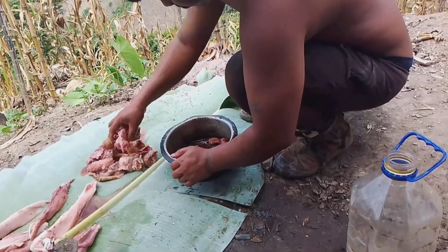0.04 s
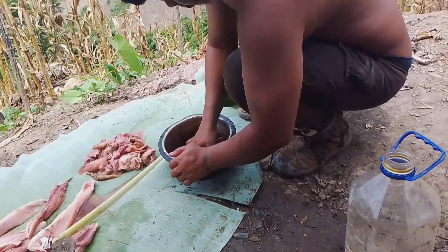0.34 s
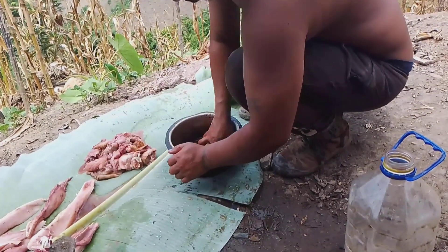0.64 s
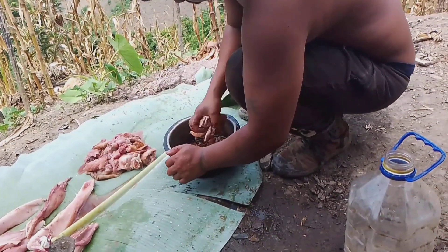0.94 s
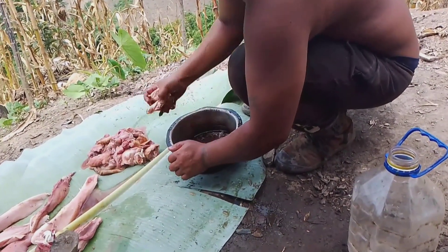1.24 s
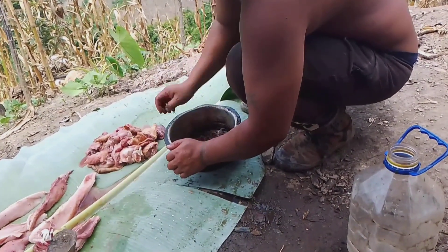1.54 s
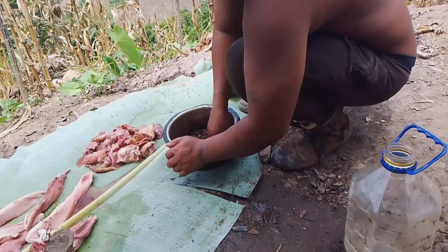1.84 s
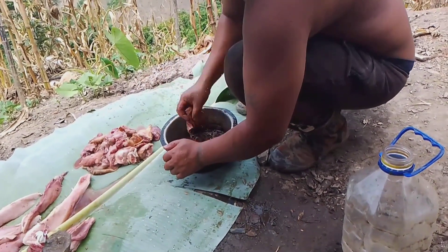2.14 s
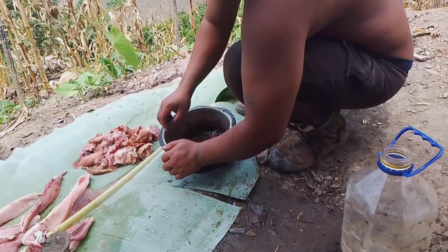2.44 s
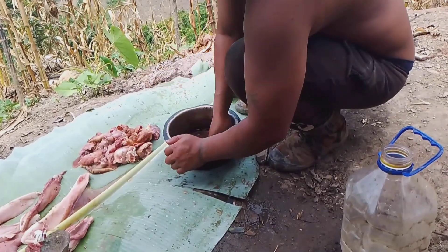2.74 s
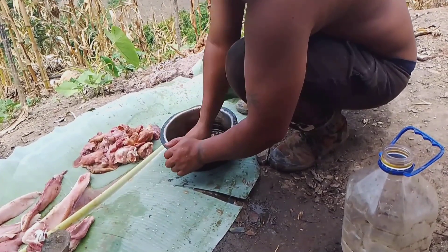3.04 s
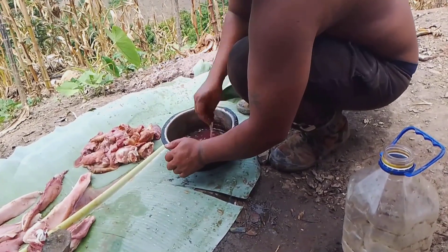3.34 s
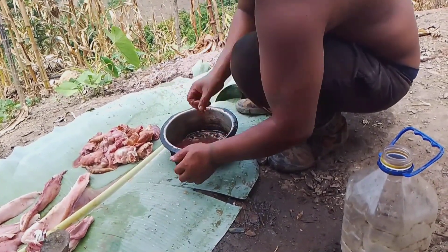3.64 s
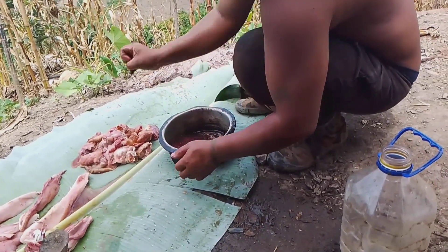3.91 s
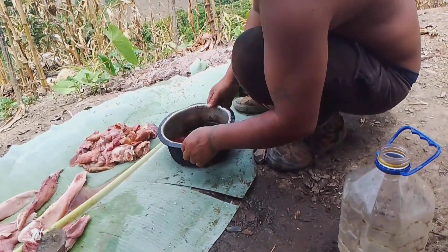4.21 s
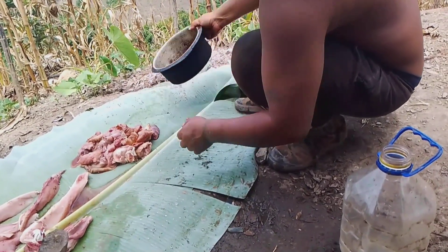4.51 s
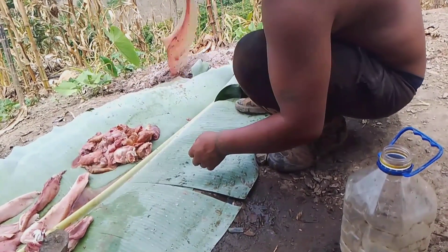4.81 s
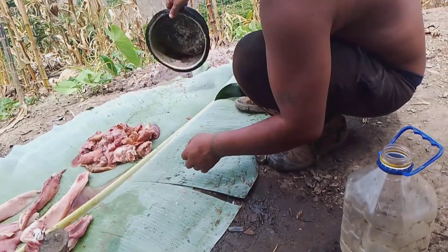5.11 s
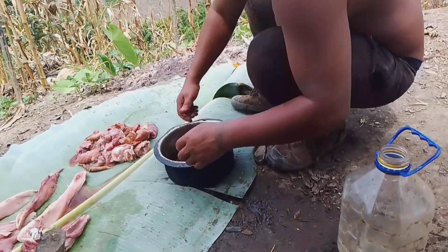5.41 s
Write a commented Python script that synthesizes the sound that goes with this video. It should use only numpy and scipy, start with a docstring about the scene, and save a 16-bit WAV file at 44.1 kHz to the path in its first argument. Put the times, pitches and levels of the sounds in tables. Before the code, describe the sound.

Close, wet handling of raw meat in a metal pot is heard over a soft, steady rush of outdoor air. Short squelches and sticky smacks start at about 0.2 seconds and are strongest between 0.5 and 0.7, with a tiny wet squeak and a faint ring of the pot. Sharp wet snaps follow around 1.1 and 1.5 seconds, then softer squishes near 2. A busier run of squelching and clicking lasts from about 2.5 to 3.7 seconds, with small plops of juice dripping back. A few faint wet sounds follow, and a plop with a light metal ring comes at 4.7. From about 4.9 to 5.1 seconds, flung water spatters on soil and dry leaves. After one more wet smack, the pot is set down at about 5.5 seconds with a dull, slightly crunchy knock, the loudest sound.

```python
"""Wet squelches and smacks: outdoors, a hand fishes raw chicken out of a metal pot and heaps it on a leaf.
Tiny wet films burst as the meat is squeezed, and bigger ones snap as it parts. Juice drips back with
short plops, and light touches make the pot ring. The last of the water is flung out and spatters on
dry ground; then the pot is set down with one dull knock. Behind it all is the soft rush of open air."""
import sys
import numpy as np
from scipy import signal
from scipy.fft import rfft, irfft
from scipy.io import wavfile
from scipy.ndimage import uniform_filter1d

SR = 44100
rng = np.random.default_rng(int(sys.argv[2]) if len(sys.argv) > 2 else 0)


def int16_out(signal):
    """Quantize to a 16-bit WAV file."""
    q = np.round(np.clip(np.atleast_2d(signal).T, -1, 1) * 32767)
    wavfile.write(sys.argv[1], SR, q.astype(np.int16))


N = 245195

# the tone of wet meat and juice: pitch_hz, level_db
WET_TONE = [(60, -54), (200, -18.5), (420, 1.5), (680, -4.5), (1000, 1.5), (2000, 7.5), (4300, 5),
            (5700, -0.5), (7200, -9.5), (10500, -22), (12500, -33), (15500, -37)]
# the tone of the finest spray from a snap: pitch_hz, level_db
CRISP_TONE = [(100, -41), (4000, 1), (7000, 3), (11000, -2.5), (12500, -13), (15500, -16)]


def squelches(best_gap_hz=2300, gap_width_share=0.29):
    """Each squeeze bursts a swarm of tiny films that ring a gap in the flesh and the pot's hollow."""
    # fingers squeezing the meat, and at 4.703 s a wet touch as the water is poured: start_s, length_s,
    # level_db, gap_pitch_hz
    squeezes = [(0.191, 0.048, -54, 3700), (0.496, 0.052, -46.5, 1900), (.578, 0.072, -43, 2640),
                (0.723, 0.092, -51.5, 3220), (1.49, 0.033, -45, 4230), (1.787, 0.125, -51, 1200),
                (1.95, 0.045, -55, 1990), (2.65, 0.037, -47.5, 1000), (2.695, 0.076, -49, 2300),
                (2.835, 0.055, -55, 2000), (2.901, 0.043, -50, 3870), (3.135, 0.04, -55.5, 1500),
                (3.172, 0.033, -48.5, 1800), (3.203, 0.05, -47.5, 2000), (3.247, .095, -49, 1400),
                (3.485, 0.025, -56, 4250), (3.663, 0.034, -49, 1300), (4.097, 0.035, -53, 4100),
                (4.366, 0.06, -56.5, 950), (4.496, .03, -57, 1100), (4.703, 0.026, -48, 1900),
                (5.239, 0.11, -57, 1400), (5.4, 0.032, -52.5, 1400)]
    out, t = np.zeros(N), np.arange(8192) / SR
    for start_s, length_s, level_db, gap_hz in squeezes:
        octaves = np.log2(gap_hz / best_gap_hz)
        gap_db = -15 * abs(octaves)  # a middle-sized gap rings best
        hollow_db = -10.5 - 6.5 * octaves  # a wide, low gap wakes the pot more
        sticky_db = -25 + 14 * octaves  # a narrow, high gap gives more sticky ticks
        pops = colour(crackle(len(t), per_s=6000, spread_db=3, cycles=7.7), WET_TONE)
        gap = unit(resonate(pops, gap_hz, gap_width_share * gap_hz))
        low_hollow = resonate(resonate(pops, 940, 410), 993, 410)
        hollow = unit(low_hollow + amp(-12.5) * resonate_twice(pops, 1580, 360))
        sticky = colour(crackle(len(t), per_s=2000, spread_db=2.5, cycles=3, pitches=8), CRISP_TONE)
        squeeze = np.minimum(t / 0.0024, 1) * np.exp(-(t / (0.86 * length_s)) ** 3)
        sound = squeeze * (pops + amp(gap_db) * gap + amp(hollow_db) * hollow + amp(sticky_db) * sticky)
        add(out, start_s, amp(level_db) * sound * np.linalg.norm(squeeze) / np.linalg.norm(sound))
    return out


def meat_smacks():
    """Wet films snap and pieces of meat slap together."""
    # one row a smack: start_s, level_db, pocket_pitch_hz, thump_db
    smacks = [(.2050, -42, 2400, -23), (.5196, -30, 1380, -9.5), (0.6446, -28.5, 4600, -11),
              (.9950, -41, 2860, -28), (0.9966, -39, 5960, -28), (1.1017, -36, 2230, -30),
              (1.1020, -28.5, 5600, -25), (1.211, -47.5, 4560, -16), (1.4948, -38.5, 3100, 4),
              (1.5015, -38, 4400, 6), (1.7890, -46.5, 2800, 0), (1.9765, -43.5, 1890, -20),
              (2.2360, -49.5, 8000, -20), (2.4690, -44, 2300, -6), (2.6512, -37, 5500, 0),
              (2.7530, -43.5, 3450, -7), (2.9072, -42, 2770, -11), (2.935, -45, 4700, -22),
              (3.059, -37.5, 4900, -32), (3.2028, -38, 4200, -22), (3.2178, -37.5, 2830, -14),
              (3.329, -41, 4380, -21), (3.707, -50, 1790, 6), (5.3972, -36, 1630, -8)]
    return wet_snaps(smacks)


def wet_snaps(rows, snap_fade_s=0.0029, tail_fade_s=0.014, thump_fade_s=0.005):
    """A film parts with a snap that rings a small pocket; the soft mass behind it adds a low thump."""
    out, t = np.zeros(N), np.arange(4096) / SR
    rise = np.minimum(t / 0.0006, 1)
    shape = rise * (np.exp(-t / snap_fade_s) + amp(-27) * np.exp(-t / tail_fade_s))
    for start_s, level_db, pocket_hz, thump_db in rows:
        skin, mass, spray = rng.standard_normal((3, len(t)))
        snap = colour(skin, WET_TONE)
        pocket = resonate_twice(snap, pocket_hz, 0.44 * pocket_hz)
        thump = resonate_twice(mass, hz=400, width_hz=330) * rise * np.exp(-t / thump_fade_s)
        crisp = colour(spray, CRISP_TONE) * np.exp(-t / snap_fade_s)  # the treble dies first
        crisp_db = -14 + 10.5 * np.log2(pocket_hz / 3500)  # small, high pockets sound crisper
        parts = [(0, shape * snap), (4, shape * pocket), (thump_db, thump), (crisp_db, shape * crisp)]
        sound = sum(amp(db) * unit(part) for db, part in parts)
        add(out, start_s, amp(level_db) * sound * np.linalg.norm(shape) / np.linalg.norm(sound))
    return highpass(out, 140, order=2)


def juice_plops():
    """Drips and air pockets ring in the juice; air squeezed through the flesh gives one longer squeak."""
    # one row a plop: start_s, level_db, pitch_hz, rise_octaves_per_s
    plops = [(0.6853, -40, 4280, -14), (1.2307, -44, 1210, 25), (2.718, -42, 1780, -8),
             (3.274, -47, 1060, -2), (3.3575, -44.5, 2130, -14), (3.592, -42, 1013, -17.5),
             (3.6312, -35, 1864, 11.5), (4.494, -43, 2080, 0.5), (4.704, -38, 1112, 3.5)]
    out = np.zeros(N)
    for start_s, level_db, pitch_hz, rise in plops:
        add(out, start_s, bubble(level_db, pitch_hz, rise, cycles=11.7))
    squeak = bubble(level_db=-30.5, pitch_hz=2686, rise=0, cycles=42)
    add(out, 0.581, squeak)
    return out


def bubble(level_db, pitch_hz, rise, cycles, fizz_db=-12):
    """An air pocket swells into a short, nearly pure tone that glides as it opens."""
    t = np.arange(2600) / SR
    length_s = cycles / pitch_hz  # low bubbles last longer
    progress = t / length_s
    opened = np.minimum(progress, 1)
    swell = np.sin(np.pi * opened) + 0.2 * opened * np.exp(-progress / 2)
    gliding_hz = pitch_hz * 2 ** (rise * np.minimum(t, 2 * length_s))
    tone = np.sin(2 * np.pi * np.cumsum(gliding_hz) / SR)
    fizz = unit(resonate_twice(rng.standard_normal(len(t)), pitch_hz, pitch_hz / 2))  # the wet rim tears
    return amp(level_db) * swell * (tone + amp(fizz_db) * fizz)


def pot_touches(reach_octaves=0.19):
    """A knuckle or a lump of meat rings the pot's wall, mostly the notes near one pitch."""
    # light touches on the wall: start_s, level_db, pitch_hz
    touches = [(0.586, -40, 2620), (2.651, -40, 870), (4.709, -38.5, 1007), (5.397, -45.5, 2540),
               (5.456, -36, 1510)]
    # notes of the thin metal, damped by the hand: pitch_hz, level_db, ring_s
    wall_notes = [(870, -10, 0.25), (1028, -7.5, 0.2), (1412, -1, 0.15), (1725, -2.5, 0.21),
                  (1770, -33, 0.078), (2185, 2.5, 0.11), (2800, 4, .09), (3530, 4.5, .1), (4080, 4, .06)]
    out, t = np.zeros(N), np.arange(12000) / SR
    for start_s, level_db, touch_hz in touches:
        notes = [(hz, db - 6 * abs(np.log2(hz / touch_hz)) / reach_octaves, ring_s)
                 for hz, db, ring_s in wall_notes]
        add(out, start_s, amp(level_db) * ring(notes, t))
    return out


def pot_landing():
    """The pot's base thuds down in a few quick bumps, each crushing wet leaf and grit."""
    # the base meets the ground and settles: start_s, thud_db, crunch_db, crunch_fade_s
    bumps = [(5.4525, -29, -33.5, .003), (5.4555, 2, -27.5, .005), (5.4595, -12, -36.5, 0.0091),
             (5.4642, -11.5, -43, 0.0083), (5.4760, -24, -34, .003)]
    # notes of the base, pressed on leaf and earth: pitch_hz, level_db, ring_s
    base_notes = [(487, -19, 0.045), (531.5, -7, 0.039), (740, -13, 0.026), (816, -19.5, 0.044),
                  (1440, -29, 0.11), (1693, -28, 0.046)]
    # the earth giving way: pitch_hz, level_db, ring_s
    earth_notes = [(152, -36.5, 0.061)]
    # the tone of crushed leaf and grit: pitch_hz, level_db
    crunch_tone = [(60, -10), (200, 6), (900, 0.5), (1600, 7), (2400, 0), (3200, 0), (4400, 4),
                   (5200, -9.5), (7200, -18), (10500, -30), (15500, -36)]
    out, t = np.zeros(N), np.arange(8192) / SR
    blow = lowpass(ring(base_notes, t), 900)  # soft ground rounds off the blow
    knock = highpass(blow, 380, order=3)  # a small pot gives out little bass
    thud = knock + highpass(ring(earth_notes, t), 70, order=1)
    for start_s, thud_db, crunch_db, fade_s in bumps:
        shape = np.minimum(t / 0.00056, 1) * np.exp(-t / fade_s)
        crunch = shape * colour(rng.standard_normal(len(t)), crunch_tone)
        add(out, start_s, amp(thud_db) * thud + amp(crunch_db) * crunch)
    return out


def flung_water(start_s=4.855, length_s=0.25, rise_s=0.02, fade_s=0.04):
    """A dense shower of drops ticks on soil and dry leaves, with a few fat ones among them."""
    # the fattest drops: start_s, level_db, splash_pitch_hz, thump_db
    fattest_drops = [(4.8570, -46.5, 990, -6), (4.912, -46, 1350, -22), (4.9280, -41.5, 3250, -20),
                     (5.0150, -35.5, 5400, -27), (5.0620, -42.5, 2400, 4), (5.1110, -37, 4850, -25),
                     (5.1382, -40, 5440, -23)]
    # the tone of fine drops landing: pitch_hz, level_db
    spray_tone = [(80, -37), (380, -6), (650, -10), (900, -3.5), (2000, 2.5), (3200, 7.5), (5300, 6.5),
                  (7500, -8), (10500, -11.5), (12500, -22), (15500, -21)]
    out, t = wet_snaps(fattest_drops), np.arange(24000) / SR
    fine = colour(crackle(len(t), per_s=11000, spread_db=4.4, cycles=6.1), spray_tone)
    fat = colour(crackle(len(t), per_s=900, spread_db=2.5, cycles=3), WET_TONE)
    shower = np.minimum(t / rise_s, 1) * np.exp(-np.maximum(t - length_s, 0) / fade_s)
    gush = hump(start_s + t, peak_s=5.025, half_width_s=0.017)  # the bulk of the water lands
    add(out, start_s, (fine + amp(-13) * fat) * (amp(-51.5) * shower + amp(-44.5) * gush))
    return out


def with_close_echo(sound, echo_db=-15, fade_s=0.011):
    """Adds a brief, dull echo off the pot, the body and the ground."""
    t = np.arange(4096) / SR
    bounces = lowpass(rng.standard_normal(len(t)) * np.exp(-t / fade_s) * (t > 0.002), 6000)
    return sound + amp(echo_db) * signal.oaconvolve(sound, bounces / np.linalg.norm(bounces))[:N]


def open_air(rush_db=-58.5):
    """The field's soft rush wavers slightly, and a thin hiss comes and goes on top."""
    # the tone of the rush: pitch_hz, level_db
    air_tone = [(25, -17), (60, -14.5), (110, -13), (160, -20), (290, -4), (400, -7), (650, -9.5),
                (1550, -8), (1850, -2), (4300, -5), (6000, -13), (7200, -18.5), (10000, -22.5),
                (12500, -38.5), (15500, -38)]
    # swells of the hiss: peak_s, half_width_s, level_db
    hiss_swells = [(.74, 0.25, -66), (3.82, 0.25, -61), (4.62, 0.078, -61), (5.22, 0.15, -65)]
    t = np.arange(N) / SR
    waver_db = unit(uniform_filter1d(uniform_filter1d(rng.standard_normal(N), size=5000), size=3000))
    rush = amp(rush_db + waver_db) * colour(rng.standard_normal(N), air_tone)
    hiss = unit(resonate_twice(rng.standard_normal(N), hz=4250, width_hz=1000))
    swells = sum(amp(db) * hump(t, peak_s, half_width_s) for peak_s, half_width_s, db in hiss_swells)
    return rush + hiss * swells


def crackle(samples, per_s, spread_db, cycles, pitches=24, glide=0.13):
    """Tiny pops of uneven size at random moments, each a few cycles of a slightly rising note."""
    out, t = np.zeros(samples), np.arange(1500) / SR
    for hz in np.geomspace(350, 14000, pitches) * rng.uniform(0.93, 1.07, pitches):
        age = np.minimum(t * hz / cycles, 6)
        pop = age * np.exp(-3 * age) * np.sin(2 * np.pi * cycles * (age + glide * age ** 2 / 2))
        sizes = amp(spread_db * np.minimum(rng.exponential(1, samples), 4))
        signs = rng.choice([-1, 1], samples)
        popping = rng.random(samples) < per_s / pitches / SR
        pops = signal.oaconvolve(sizes * signs * popping, pop / np.linalg.norm(pop))
        out += np.sqrt(hz) * pops[:samples]
    return unit(out)


def ring(notes, t):
    """The pure notes of a struck object, each fading by 60 dB in its ring_s."""
    return sum(amp(db - 60 * t / ring_s) * np.sin(2 * np.pi * hz * t) for hz, db, ring_s in notes)


def colour(sound, tone):
    """Shapes a sound's lows and highs by a tone table, then sets its average level to 1."""
    pitch_hz, level_db = np.transpose(tone)
    hz = np.fft.rfftfreq(len(sound), 1 / SR)
    gain = amp(np.interp(np.log(hz + 1), np.log(pitch_hz), level_db))
    return unit(irfft(rfft(sound) * gain, len(sound)))


def resonate(sound, hz, width_hz):
    """Keeps the band around one pitch, as a ringing hollow does."""
    return signal.lfilter(*signal.iirpeak(hz, hz / width_hz, fs=SR), sound)


def resonate_twice(sound, hz, width_hz):
    """Picks out the band more sharply."""
    return resonate(resonate(sound, hz, width_hz), hz, width_hz)


def highpass(sound, hz, order):
    """Cuts the bass."""
    return signal.sosfilt(signal.butter(order, hz, "high", fs=SR, output="sos"), sound)


def lowpass(sound, hz):
    """Cuts the treble."""
    return signal.lfilter(*signal.butter(2, hz, fs=SR), sound)


def hump(t, peak_s, half_width_s):
    """A smooth rise and fall."""
    return np.exp(-((t - peak_s) / half_width_s) ** 2)


def amp(db):
    """Turns decibels into a multiplier."""
    return 10 ** (np.asarray(db) / 20)


def unit(sound):
    """Sets the average (rms) level to 1."""
    return sound / np.sqrt(np.mean(sound ** 2) + 1e-20)


def add(mix, start_s, sound):
    """Lays a sound into the mix."""
    part = mix[max(round(start_s * SR), 0):][:len(sound)]
    part += sound[:len(part)]


def scene():
    """Mixes meat, pot, water and air into one channel."""
    handling = with_close_echo(squelches() + meat_smacks() + juice_plops() + pot_touches())
    return (handling + pot_landing() + flung_water() + open_air())[None]


def record(dry):
    """Cuts the very highest treble, above 15650 Hz."""
    treble_cut = signal.firwin(511, 15650, window=("kaiser", 9), fs=SR)
    return signal.oaconvolve(dry, treble_cut[None], "same")


dry = scene()
out = record(dry)
int16_out(out)
```